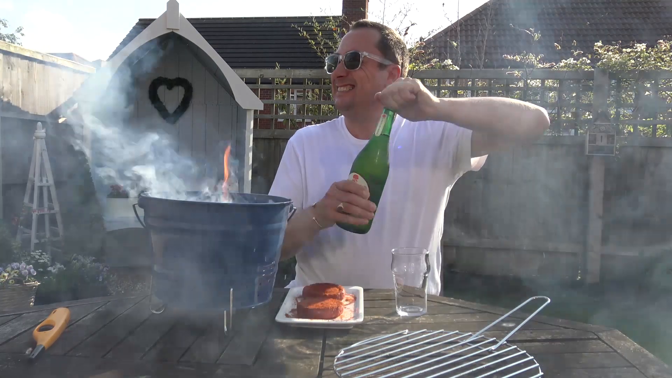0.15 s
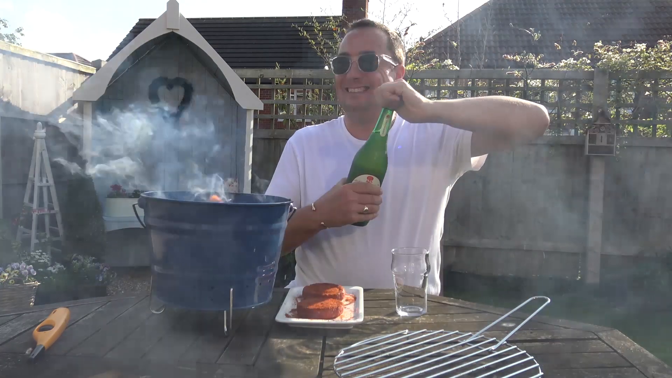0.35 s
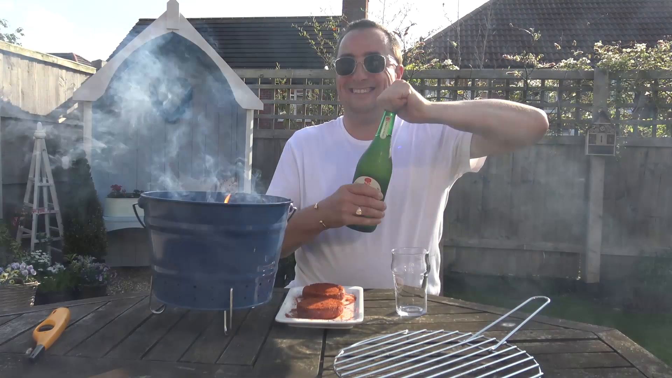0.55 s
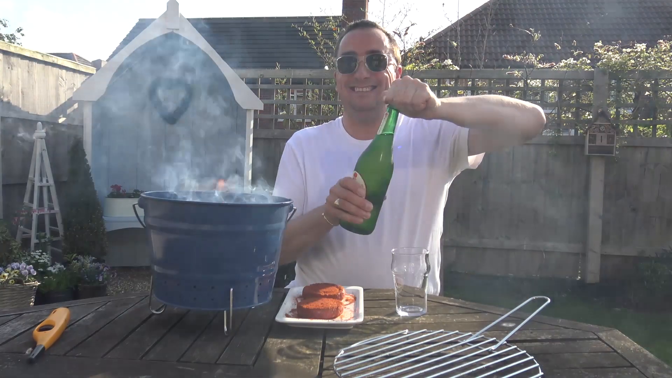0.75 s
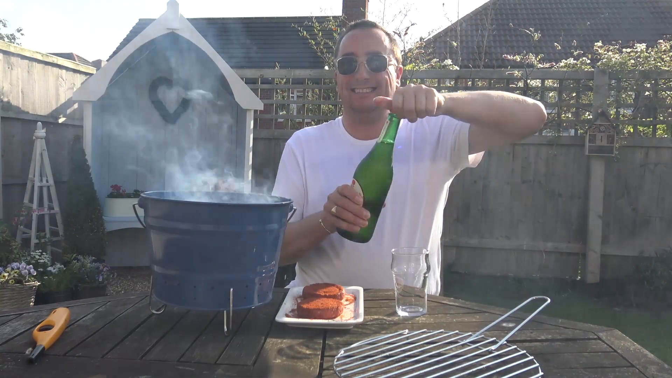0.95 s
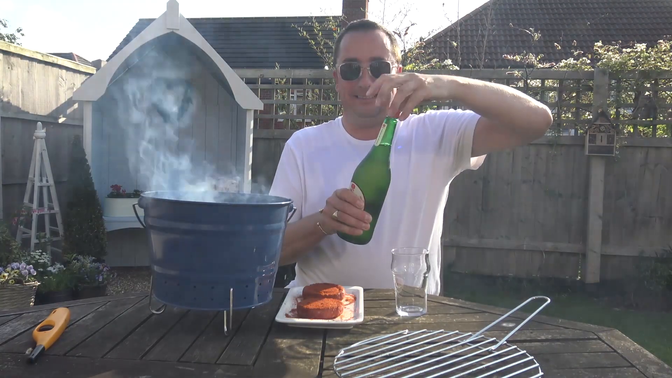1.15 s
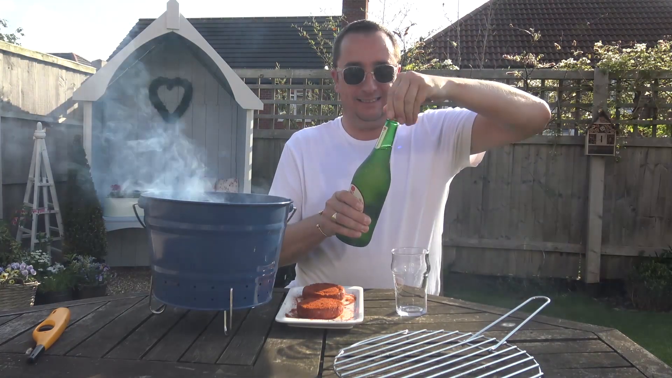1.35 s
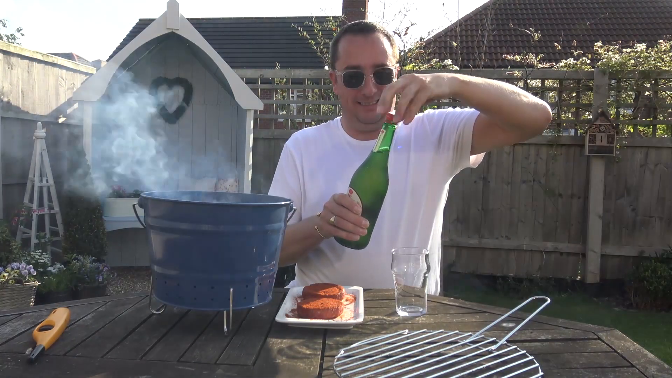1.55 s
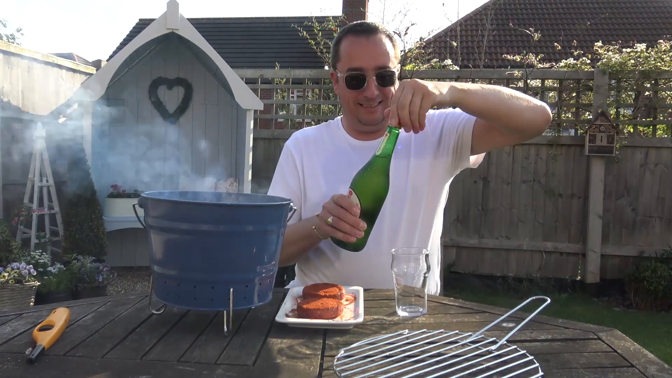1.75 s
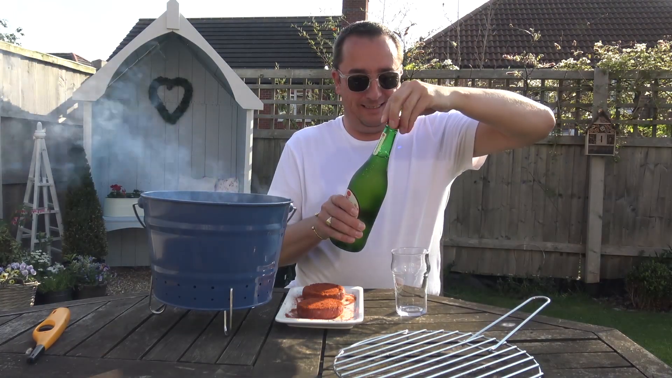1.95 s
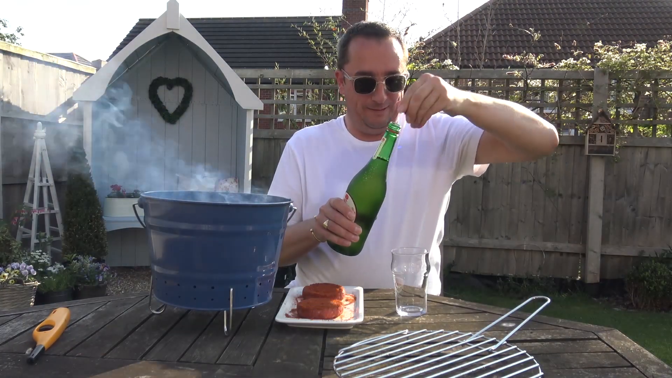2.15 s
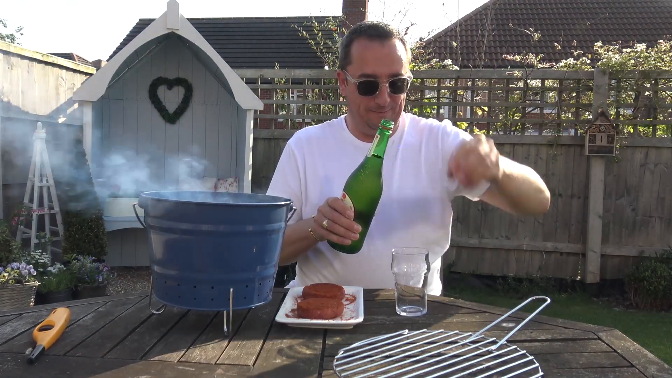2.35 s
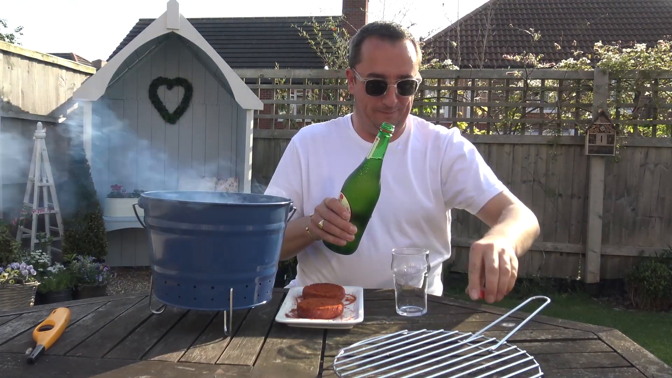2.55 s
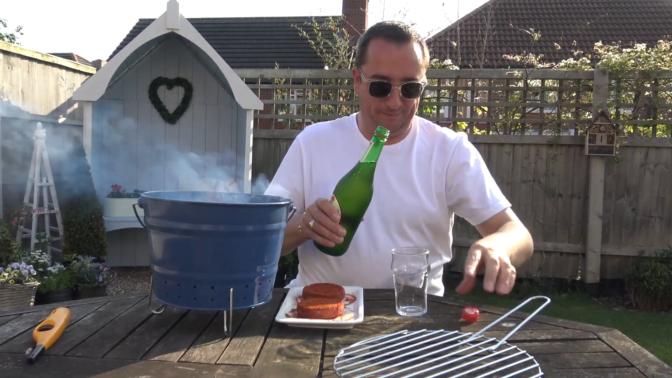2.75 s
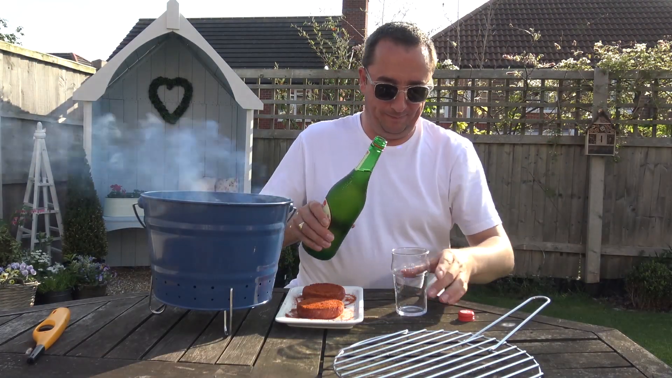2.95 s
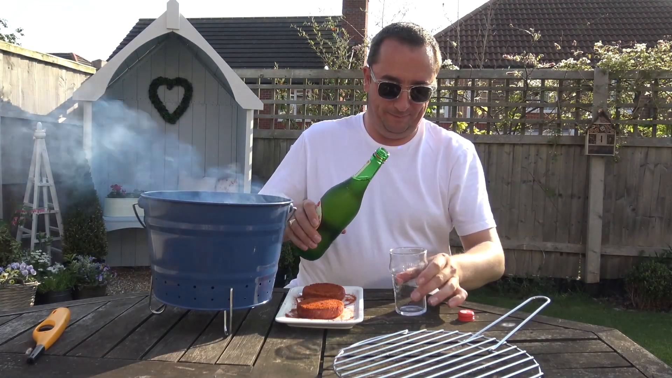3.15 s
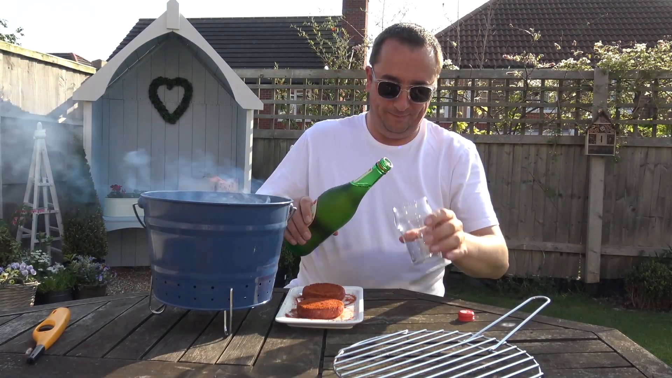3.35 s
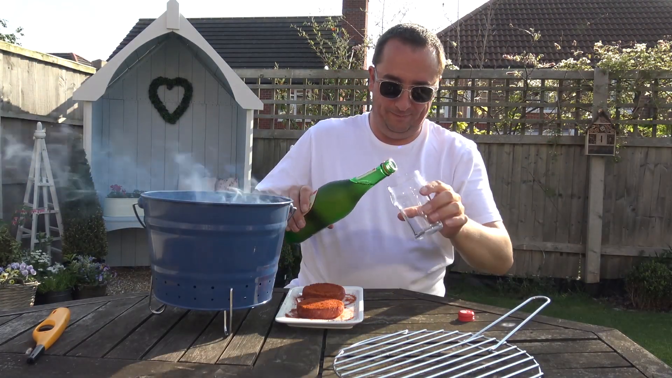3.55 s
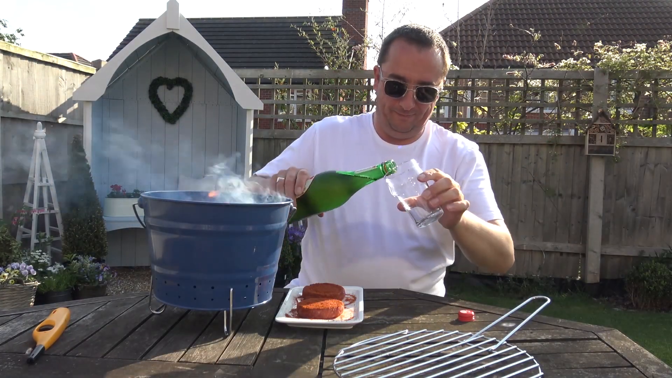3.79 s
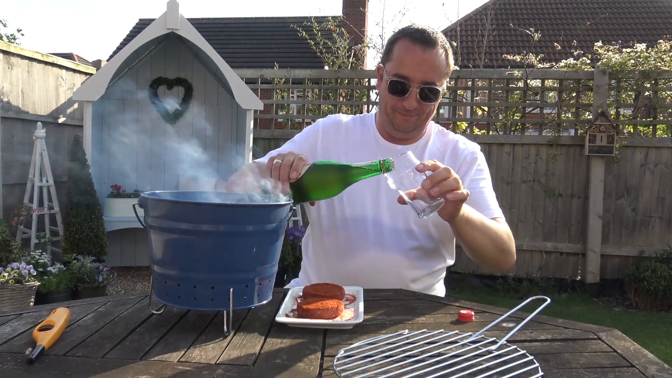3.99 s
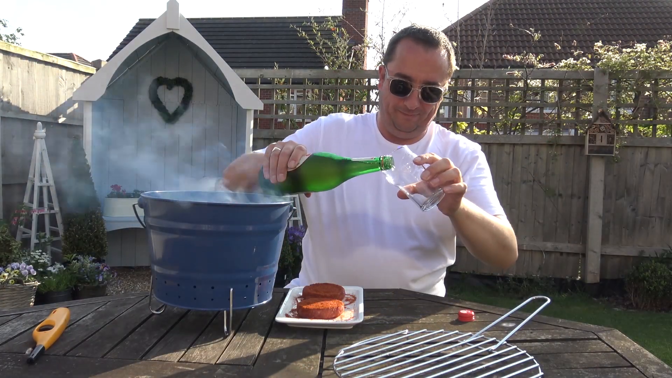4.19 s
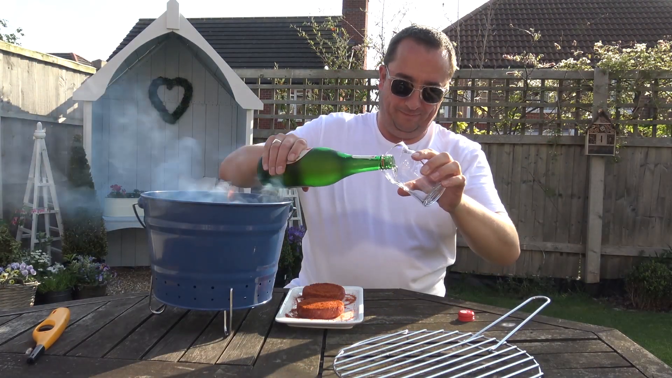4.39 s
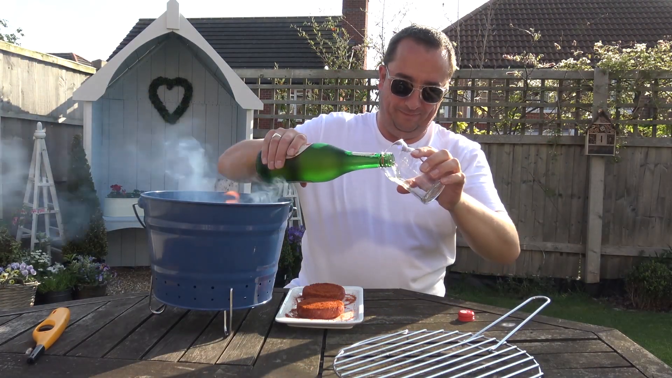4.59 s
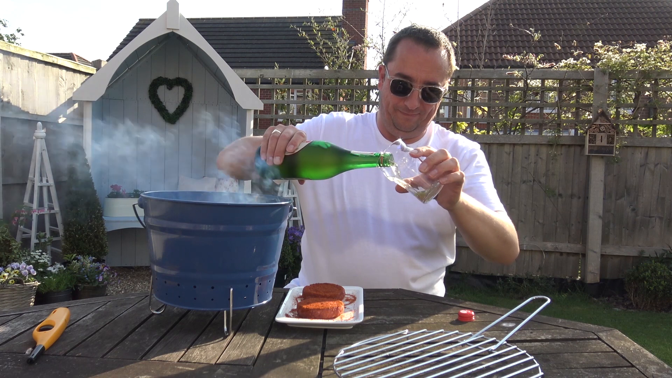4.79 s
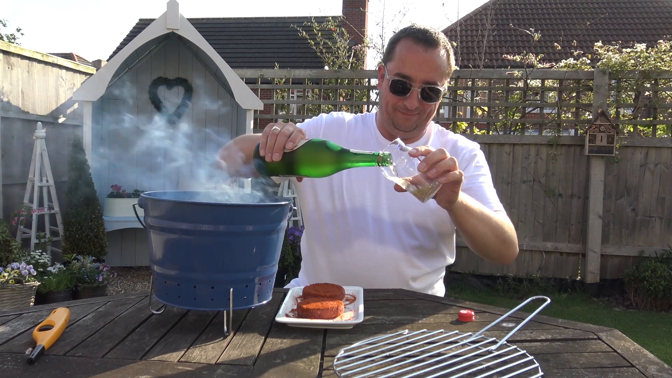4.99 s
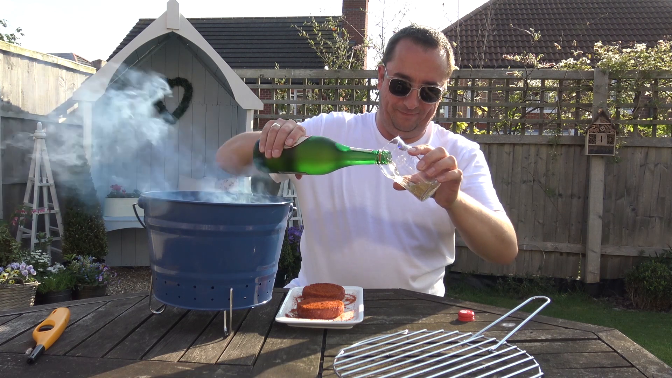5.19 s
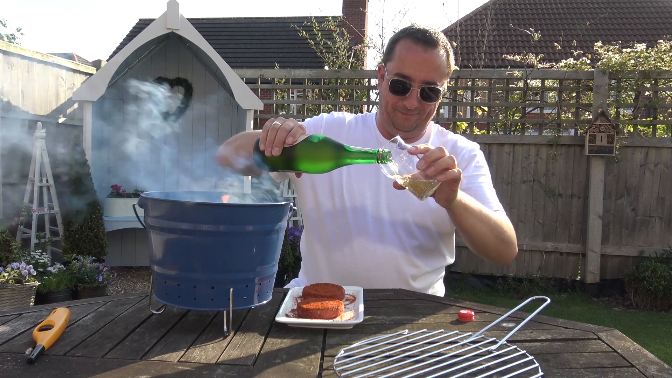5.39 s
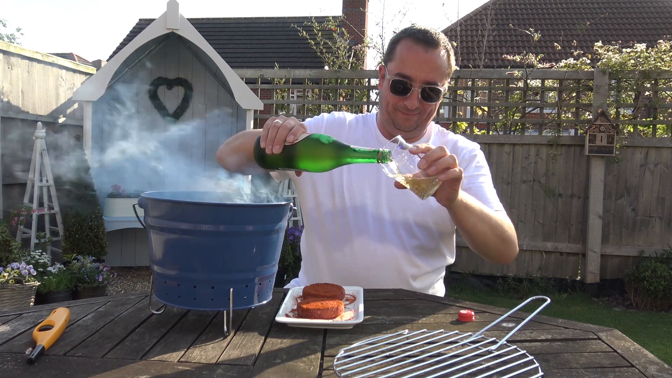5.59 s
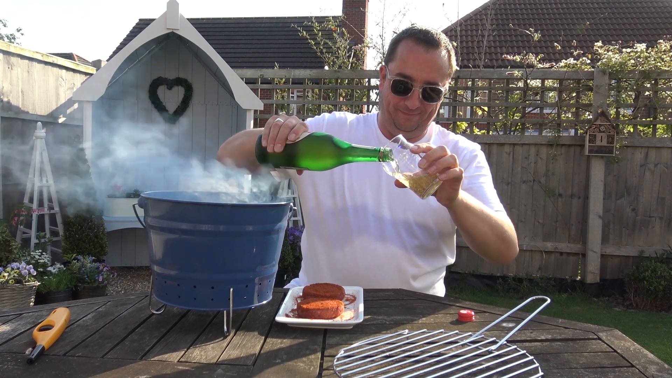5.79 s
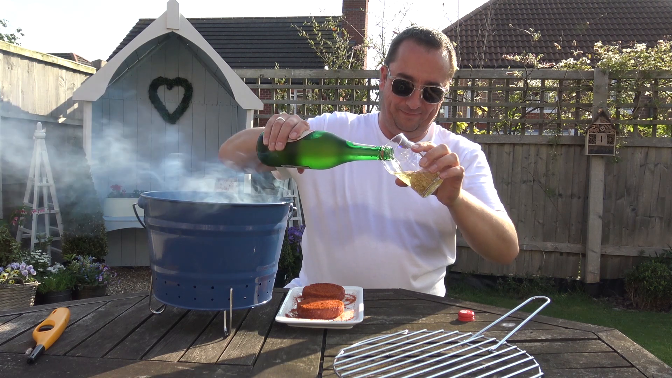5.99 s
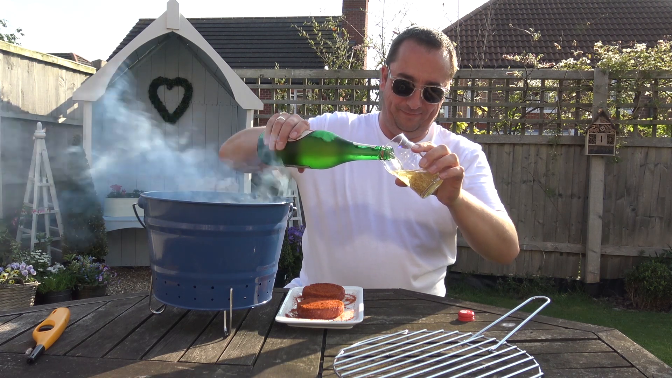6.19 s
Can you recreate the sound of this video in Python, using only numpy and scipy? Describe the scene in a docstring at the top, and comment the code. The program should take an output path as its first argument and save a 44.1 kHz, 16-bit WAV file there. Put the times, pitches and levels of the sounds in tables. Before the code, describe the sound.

A fizzy bottle's screw cap hisses, cracks open and drops on wood, then glass clinks and a drink glugs out beside a garden barbecue.

```python
"""A glass bottle of fizzy drink is opened at a wooden garden table. Gas hisses from under the metal cap
over a brief low drone, the seal snaps, and the cap grinds up its thread, lifts off and bounces on the
planks. A tumbler ticks as it is lifted, the neck chatters against it twice, then the drink glugs out,
dripping and fizzing. Throughout, barbecue flames flutter, air stirs at the microphone, small birds
call far off and fences answer faintly."""
import sys
import numpy as np
from scipy import signal
from scipy.fft import rfft, irfft, next_fast_len
from scipy.io import wavfile
from scipy.ndimage import map_coordinates

SR = 44100
rng = np.random.default_rng(int(sys.argv[2]) if len(sys.argv) > 2 else 0)


def generate_wav(signal):
    """Clip the signal to [-1, 1] and save it as 16-bit WAV at the path in sys.argv[1]."""
    frames = np.transpose(np.atleast_2d(signal))
    scaled = np.clip(frames, -1, 1) * 32767
    pcm = np.round(scaled).astype(np.int16)
    wavfile.write(sys.argv[1], SR, pcm)


N = 275184
TIME = np.arange(N) / SR  # the scene's clock [s]
T = np.arange(SR // 2) / SR  # one event's clock [s]

# the bottle's ringing modes: (frequency [Hz], level [dB], t60 [s])
BOTTLE_MODES = [(668, -1, .15), (2842, 0, .4), (4070, -17, .08), (5180, -22, .08), (8450, -14, .05)]


def amp(db):
    """Decibels to gain."""
    return 10 ** (np.asarray(db) / 20)


def unit(x):
    """Scale to rms 1."""
    return x / np.sqrt(np.mean(x ** 2) + 1e-20)


def along(points, hz):
    """Read (Hz, value) points on a log frequency axis."""
    f, v = np.transpose(points)
    return np.interp(np.log(hz + 1), np.log(f + 1), v)


def curve(rows):
    """One value per sample from (s, value) rows."""
    return np.interp(TIME, *np.transpose(rows))


def wobble(rate, size=N):
    """A smooth random curve, rate knots a second."""
    knots = rng.standard_normal(int(size * rate / SR) + 4)
    return map_coordinates(knots, [np.arange(size) * rate / SR])


def filtered(x, response):
    """x through a complex frequency response."""
    m = next_fast_len(len(x) + SR // 2)
    return irfft(rfft(x, m) * response(np.fft.rfftfreq(m, 1 / SR)), m)[:len(x)]


def coloured(x, spectrum):
    """x with a (Hz, dB) colour, at rms 1."""
    return unit(filtered(x, lambda hz: amp(along(spectrum, hz))))


def resonate(x, peaks):
    """x through (Hz, width Hz, dB) resonances of alternating polarity."""
    return filtered(x, lambda f: sum(
        (-1) ** k * amp(db) * 1j * f * width / (hz * hz - f * f + 1j * f * width)
        for k, (hz, width, db) in enumerate(peaks)))


def highpass(x, edge_hz):
    """Small things radiate little bass."""
    return signal.sosfilt(signal.butter(4, edge_hz, "high", fs=SR, output="sos"), x)


def lowpass(x, edge_hz):
    """A contact of finite length has little top."""
    return signal.sosfilt(signal.butter(2, edge_hz, fs=SR, output="sos"), x)


def sweep(hz):
    """The running phase of a gliding pitch."""
    return 2 * np.pi * np.cumsum(hz) / SR


def ring(modes):
    """Free ringing of (Hz, dB, t60) modes."""
    return sum(amp(db - 60 * T / t60) * np.sin(2 * np.pi * hz * T) for hz, db, t60 in modes)


def burst(t60):
    """Noise that starts at once and dies away."""
    return amp(-60 * T / t60) * rng.standard_normal(len(T))


def unit_hit(x):
    """Scale a hit to the energy of one millisecond at full level."""
    return x / np.sqrt(np.sum(x ** 2) * 1000 / SR)


def attack(rise_s):
    """A softened onset."""
    return 1 - np.exp(-T / rise_s)


def arch(length):
    """A smooth swell and fall."""
    return np.sin(np.pi * np.minimum(T / length, 1))


def add(track, s, x):
    """Mix x into the track at s seconds."""
    start = max(round(s * SR), 0)
    track[start:start + len(x)] += x[:N - start]


def grit(spike_db, size=N):
    """Tiny random impacts; spike_db gathers them into loud and soft clumps."""
    impacts = rng.standard_normal(size) * (rng.random(size) < 4000 / SR)
    return impacts * amp(spike_db * np.clip(wobble(350, size), -2, 2))


def garden(x):
    """A faint scatter from fences and walls."""
    # the scatter's decay: (frequency [Hz], t60 [s])
    decay = [(300, 0.28), (2500, 0.39), (5000, 0.17), (9000, .33), (15000, 0.28)]
    hz, t, noise = signal.stft(rng.standard_normal(SR), SR, nperseg=256)
    tail = signal.istft(noise * amp(-60 * t / along(decay, hz)[:, None]), SR, nperseg=256)[1]
    answer = np.zeros(N)
    add(answer, .008, amp(-21) * tail / np.linalg.norm(tail))
    return signal.fftconvolve(x, answer)[:N]


def air():
    """The hush of the garden, gusts on the microphone and a low drone that sags and soon fades."""
    # colours of the hush and of the wind's rumble: (frequency [Hz], level [dB])
    hush_colour = [(50, -6.5), (90, -1.5), (200, -5), (300, -12.5), (470, -9.5), (700, -8.5), (1000, -9.5),
                   (1600, -17.5), (2600, -26), (4200, -30.5), (6800, -34.5), (8200, -31), (10500, -38),
                   (16000, -37.5)]
    buffet_colour = [(4, -7), (10, -5.5), (18, -8), (30, -18.5), (60, -22.5), (120, -44), (300, -81.5)]
    # gusts: (peak time [s], level [dB], half width [s])
    gusts = [(1.38, -39, 0.11), (1.92, -39, 0.13), (3.05, -37, 0.25), (3.6, -37, .2), (4.17, -32, 0.16),
             (4.55, -32.5, 0.26), (5.6, -44, 0.32), (6.24, -40, 0.063)]
    hush = amp(-50 + 1.3 * wobble(2)) * coloured(rng.standard_normal(N), hush_colour)
    wind = amp(-45.5) + sum(amp(db) * np.exp(-((TIME - s) / width) ** 2) for s, db, width in gusts)
    buffet = wind * amp(-1 + 2 * wobble(16)) * coloured(rng.standard_normal(N), buffet_colour)
    drone_hz = 31 + 12 * np.exp(-TIME / .25)
    drone_db = -40.5 - 54 * np.maximum(TIME - 0.78, 0)
    return hush + buffet + amp(drone_db) * np.sin(sweep(drone_hz))


def birds():
    """Falling chirps, blurred by distance."""
    # chirps: (time [s], length [s], start pitch [Hz], end pitch [Hz], level [dB], blur [Hz])
    chirps = [(0.47, 0.1, 4970, 4130, -68, 81), (0.536, 0.16, 4200, 3660, -59.5, 580),
              (1.194, 0.074, 4900, 4420, -69, 61), (1.326, 0.14, 4110, 3570, -55, 590),
              (2.242, .37, 3500, 3360, -71, 39.9), (2.597, 0.16, 3080, 2630, -63, 49.8),
              (2.985, 0.13, 4400, 3730, -52.5, 505), (3.439, 0.11, 3206, 3040, -64.5, 350),
              (5.702, 0.16, 4530, 3820, -58, 504)]
    out = np.zeros(N)
    for s, length, start_hz, end_hz, db, blur_hz in chirps:
        phase = sweep(np.interp(T, [0, length], [start_hz, end_hz]))
        call = wobble(2 * blur_hz, len(T)) * np.sin(phase) + wobble(2 * blur_hz, len(T)) * np.cos(phase)
        tail = amp(-18 - 60 * T / .7) * arch(T[-1])
        add(out, s, amp(db) * call * (arch(length) + tail))
    return out


def flames():
    """Burning coals puff softly over an irregular flutter."""
    # the flutter's colour: (frequency [Hz], level [dB])
    flutter_colour = [(90, -20.5), (190, -0.5), (300, -6), (460, 3.5), (650, -11.5), (1200, -36.5),
                      (3000, -72)]
    # the main puffs of flame: (time [s], level [dB])
    puffs = [(.159, -32), (.437, -35.5), (.621, -31.5), (.863, -28.5), (1.075, -27.5), (1.176, -30.5),
             (1.526, -30), (1.766, -34.5), (2.515, -32), (2.578, -31), (2.728, -33), (3.07, -38),
             (3.376, -30.5), (4.663, -35.5), (5.19, -28.5), (5.986, -35.5)]
    out = amp(-55 + 4.7 * np.clip(wobble(32), -2, 2)) * coloured(rng.standard_normal(N), flutter_colour)
    stray_puffs = [(s, -34) for s in rng.uniform(0, TIME[-1], size=8)]
    for s, db in puffs + stray_puffs:
        hz = 472 * (1 + 0.02 * rng.normal())
        puff = resonate(arch(0.013) * rng.standard_normal(len(T)), [(190, 50, -4), (hz, 90, 0)])
        add(out, s - .002, amp(db + 4.5) * unit_hit(lowpass(puff, 1100)))
    return out


def handling():
    """The tumbler ticks against the table and the fingers as it is lifted."""
    # light touches: (time [s], level [dB])
    ticks = [(3.2121, -43), (3.4186, -48), (3.5403, -47)]
    # a tick's resonances: (frequency [Hz], width [Hz], level [dB])
    tick_peaks = [(4200, 1450, -1), (7970, 2000, 0.5), (12500, 2500, -5.5)]
    out = np.zeros(N)
    for s, db in ticks:
        add(out, s, amp(db - 5) * unit_hit(resonate(burst(.025), tick_peaks)))
    return out


def gas():
    """The jet under the cap; one whistling resonance swells, then sinks as the pressure falls."""
    # the escape's envelope: (time [s], level [dB])
    escape = [(0.0, -28.5), (0.014, -31), (0.078, -25), (0.128, -29), (0.26, -44), (0.348, -52.5),
              (0.45, -65)]
    # the jet's colour: (frequency [Hz], level [dB])
    jet_colour = [(530, -52.5), (900, -21.5), (1150, -29.5), (1750, -18), (2120, -26), (3550, -15.5),
                  (4050, -24.5), (4520, -7.5), (5550, -15), (6110, -4.5), (7060, -11.5), (7860, -7),
                  (10400, -15), (12300, -14), (16000, -19.5)]
    # the whistle in the gap: (time [s], pitch [Hz], level within the hiss [dB])
    glide = [(0, 7980, -12), (.085, 7980, -0.5), (.145, 6210, 2.5), (.22, 5340, -20), (.35, 4580, -5)]
    jet = coloured(rng.standard_normal(N), jet_colour)
    whistle_hz = curve([(s, hz) for s, hz, db in glide])
    whistle_db = curve([(s, db) for s, hz, db in glide])
    whistle = amp(whistle_db) * unit(wobble(1400) * np.sin(sweep(whistle_hz)))
    cavity = unit(resonate(rng.standard_normal(N), [(8000, 260, 0)]))
    flow = amp(curve(escape) - 1.4 + 0.71 * wobble(120)) * curve([(.37, 0.98), (.44, 0.05)])
    return flow * (amp(-0.5) * jet + whistle + amp(-6.5) * cavity)


def rub(force, skirt_share):
    """Friction shared between the glass thread and the cap's thin, shrill skirt."""
    # resonances of thread and skirt: (frequency [Hz], width [Hz], level [dB])
    thread_peaks = [(766, 86, -3.5), (1248, 185, -7), (1930, 570, -2), (2370, 400, -4.5), (2750, 280, -2),
                    (3800, 820, -6), (4650, 200, -7), (5070, 400, -12), (8320, 1200, -17.5)]
    skirt_peaks = [(2968, 370, -7), (5200, 440, -9), (6870, 640, -1), (8150, 660, 4), (9500, 500, -2.5),
                   (10400, 1200, -9.5), (12700, 1000, -4.5), (15200, 790, -9)]
    rasp = unit(resonate(force, thread_peaks))
    skirt = unit(resonate(force, skirt_peaks))
    return np.sqrt(1 - skirt_share) * rasp + np.sqrt(skirt_share) * skirt


def thread():
    """The cap grinds up the thread, damping the neck until it lifts off and the bottle rings on."""
    # twists of the wrist: (peak time [s], level [dB], swell [s], release [s], skirt share [0-1])
    strokes = [(.85, -31, 0.2, 0.12, .8), (1.048, -39.5, 0.025, 0.032, 0.28),
               (1.385, -43.5, .08, .12, 0.17), (1.452, -32.5, 0.088, 0.067, 0),
               (1.502, -29, 0.049, 0.018, 0.03), (1.737, -25.5, 0.039, 0.063, .12),
               (1.88, -27.5, 0.043, .025, .5), (1.924, -34.5, 0.046, .038, .45),
               (2.124, -36, 0.074, .085, .18)]
    # the thread catching and slipping: (time [s], level [dB], length [s], skirt share [0-1])
    slips = [(1.29, -43, 0.0072, .4), (1.312, -41.5, 0.0063, 0.16), (1.372, -35.5, 0.0078, 0),
             (1.443, -38.5, 0.011, 0), (1.678, -26, 0.01, .35), (1.863, -27, 0.02, 0.76),
             (1.986, -22, 0.0052, 0.4), (1.9887, -18, 0.0083, .4), (2.005, -30, .0081, 0),
             (2.152, -39, .02, .5)]
    lift_s = 2.161
    out = np.zeros(N)
    for s, db, swell, release, skirt_share in strokes:
        effort_db = -20 * np.maximum((s - TIME) / swell, (TIME - s) / release)
        out += amp(db - 5 + effort_db) * rub(grit(spike_db=1.5), skirt_share)
    out *= np.clip((lift_s - TIME) / 0.013 + 1, 0, 1)
    for s, db, length, skirt_share in slips:
        grip = arch(length) + amp(-9.5 - 60 * T / 0.1)
        add(out, s, amp(db) * grip * rub(grit(spike_db=-3, size=len(T)), skirt_share))
    looseness_db = curve([(1.5, 5.5), (1.65, 16)])  # the neck rings more as the cap gives
    neck_peaks = [(2850, 26, 1.5), (4080, 50, -16), (5190, 50, -17), (8450, 80, -14)]
    out += resonate(out * amp(looseness_db), neck_peaks)
    add(out, lift_s, amp(-32.5) * ring(BOTTLE_MODES) * attack(.003))  # the fingers let go gently
    return highpass(out, 500)


def seal():
    """Each bridge of the seal cracks, shaking the cap and setting the bottle ringing."""
    # bridges breaking: (time [s], level [dB], low shelf [dB], top shelf [dB])
    snaps = [(.642, -8, 4.5, 3), (0.6971, -5.5, -1, -4.5), (0.7352, -5, 4, -4.5), (0.7798, -5.5, -6.5, -15),
             (0.8115, -10, 2.5, -11), (0.8491, -5.5, 8, 5.5)]
    # the crack's resonances: (frequency [Hz], width [Hz], level [dB])
    crack_peaks = [(1472, 210, -12.5), (2920, 270, -5), (3823, 460, -9.5), (4940, 330, 0.5),
                   (6240, 637, -2), (8000, 660, 7.5), (9430, 470, -12.5), (10400, 837, -16.5),
                   (12970, 1600, -4), (13240, 800, -10.5), (16780, 600, -22.5)]
    out = np.zeros(N)
    for s, db, low_db, top_db in snaps:
        shelves = [(4500, low_db), (7500, 0), (12000, top_db)]
        peaks = [(hz * (1 + 0.021 * rng.normal()), width, level + along(shelves, hz))
                 for hz, width, level in crack_peaks]
        tear = arch(0.0018) * burst(0.0067) + amp(-16.5) * burst(0.023)
        crack = highpass(unit_hit(resonate(tear, peaks)) + amp(-13) * unit_hit(tear), 1250)
        damped_ring = amp(db + low_db - 27 - 60 * T / 0.17) * ring(BOTTLE_MODES[1:])
        add(out, s, amp(db + 3.5) * crack + damped_ring)
        add(out, s + .0143, amp(db - 13.5) * crack)  # slap off a near surface
    return out


def cap():
    """The dropped cap clacks, rings thinly and knocks the planks at each bounce."""
    # bounces: (time [s], level [dB], planks [dB], plank tilt [dB/octave], cap ring [dB])
    bounces = [(2.7773, -7.5, 0.5, -1, 13.5), (2.8178, -17.5, 6, -2, -9), (2.8639, -12.5, 2.5, 4.5, -8),
               (2.8801, -13, -5, -2, 4.5), (2.927, -17, 2.5, 4.5, 9.5), (2.9507, -40, 20, 5, 18)]
    # resonances of the cap's shell and of the planks: (frequency [Hz], width [Hz], level [dB])
    shell_peaks = [(2050, 150, -2), (2560, 350, -3.5), (3230, 530, -1.5), (4130, 242, 1),
                   (5300, 800, -22.5), (8750, 4500, -35)]
    plank_peaks = [(393, 110, -1.5), (486, 140, -1.5), (684, 200, 0), (830, 180, -1.5), (1160, 130, 0.5),
                   (1650, 150, -4.5), (2120, 290, -3.5), (2770, 290, -8)]
    # the cap's metallic ring: (frequency [Hz], level [dB], t60 [s])
    cap_modes = [(6760, -1, 0.04), (7040, -10.5, 0.066), (12500, -11.5, 0.064), (13100, -10, .05),
                 (14500, -16.5, .05)]
    out = np.zeros(N)
    for s, db, planks_db, tilt_db, ring_db in bounces:
        shell = [(hz * (1 + 0.0076 * rng.normal()), width, level) for hz, width, level in shell_peaks]
        strike = burst(0.012) + amp(-26) * burst(.055)
        clack = amp(5) * unit_hit(lowpass(resonate(strike, shell), 9400))
        wood = [(hz, width, level + tilt_db * np.log2(hz)) for hz, width, level in plank_peaks]
        knock = amp(planks_db - 4.5) * unit_hit(highpass(resonate(burst(0.1), wood), 330))
        add(out, s, amp(db) * (clack + knock + amp(ring_db - 24) * ring(cap_modes)))
    return out


def glugs():
    """Each gulp of air into the neck rings briefly and sinks in pitch as it swells."""
    # gulps: (time [s], level [dB], nominal pitch [Hz])
    gulps = [(4.5238, -29, 1510), (4.7946, -24.5, 1557), (5.0654, -22, 1596), (5.3398, -31, 1637),
             (5.6193, -27, 1794), (5.905, -26.5, 2100), (6.2135, -36.5, 2000)]
    # the air pocket's modes: (pitch multiple [ratio], level [dB])
    pocket_modes = [(0.448, 0.5), (1.003, 3), (1.31, -7.5), (2.34, -12.5), (3.52, -19)]
    out = np.zeros(N)
    life = attack(0.00075) * np.exp(-(T / 0.0067) ** 2)
    for s, db, hz in gulps:
        phase = sweep(hz * (0.912 + 0.11 * np.exp(-T / 0.014)))
        pocket = sum(amp(level) * np.sin(multiple * phase) for multiple, level in pocket_modes)
        add(out, s, amp(db - 7.5) * life * pocket)
    return out


def drips():
    """Drops plink in the tumbler, each splash ringing a small cavity."""
    # the clearest drops: (time [s], level [dB])
    drops = [(5.413, -43), (5.6226, -32.5), (5.6725, -35.5), (5.721, -42.5), (5.8694, -39), (5.892, -44),
             (6.0123, -42)]
    driplets = [(s, -50) for s in rng.uniform(5.28, 6.9, size=6)]
    out = np.zeros(N)
    for s, db in drops + driplets:
        hz = 2250 * (1 + 0.048 * rng.normal())
        cavity = [(hz, 90, 0), (hz * rng.uniform(1.44, 2.06), 200, -8),
                  (hz * rng.uniform(1.85, 3.1), 300, -10), (8000, 700, -12)]
        splash = lowpass(burst(0.032) * attack(0.00051), 7200)
        add(out, min(s, TIME[-1]), amp(db - 0.5) * unit_hit(resonate(splash, cavity)))
    return out


def fizz():
    """The first liquid foams on the dry glass, then settles to a simmer."""
    # the foam's colour: (frequency [Hz], level [dB])
    foam_colour = [(1000, -24.5), (2200, 2.5), (3300, 0.5), (4500, -3), (5400, -.5), (6700, -8.5),
                   (8200, -8), (15000, -21)]
    age = TIME - 4.33
    foam = np.clip(age / .1, 0, 1) * amp(np.maximum(-59 - 8.5 * age, -69))
    return foam * coloured(grit(spike_db=0), foam_colour)


def rattle(hz, rough):
    """A mode whose phase is shaken by the sliding contact."""
    knots = np.linspace(0, T[-1], num=85)
    shake = np.interp(T, knots, rng.standard_normal(len(knots)))
    return np.sin(2 * np.pi * hz * T + rough * attack(0.0026) * shake)


def contacts(flight, shortest, chatter):
    """Contact times in a chatter: each flight is shorter than the last, down to a steady buzz."""
    flights = np.maximum(flight * .589 ** np.arange(20), shortest)
    times = np.append(0, np.cumsum(flights))
    return times[times < chatter]


def clinks():
    """The neck bounces ever faster on the rim, buzzing at each contact; at rest it damps the glass."""
    # the neck meets the rim: (time [s], level [dB], first flight [s], shortest flight [s],
    # chatter length [s], at rest after [s], place [0 lip - 1 further in])
    touches = [(4.0188, -12.3, .02497, .00863, .105, .125, .03),
               (4.3073, -14.3, .00519, .0047, .034, .052, .96)]
    # neck and tumbler ringing: (frequency [Hz], t60 [s], level at the lip [dB], level further in [dB])
    glass_modes = [(723, .14, -10, -6), (1993, .15, 3.5, -4.5), (2068, .09, -13, -2), (2832, .13, -2, 1.5),
                   (4382, .2, -7.5, -19), (5180, .12, -5.5, -5), (765, .05, -9, -11), (1910, .07, -8, -7),
                   (2170, .05, -14, -10), (2570, .05, -20, -11), (2912, .07, -11, -10),
                   (3190, .06, -20, -11), (3680, .06, -26, -19), (4530, .17, -26, -11),
                   (5045, .06, -20, -11), (6300, .07, -32, -13), (7110, .1, -28, -23),
                   (7945, .11, -19, -15), (8050, .06, -28, -17), (11630, .05, -25, -31),
                   (12340, .08, -26, -21), (13460, .05, -32, -29), (14550, .05, -35, -33)]
    slide_s, scatter_db, bounce_loss_db = 0.093, 1.2, 2.14
    # the free side of the glass rings on, faint and long
    after_ring = ring([(hz, lip, t60 * 3.4) for hz, t60, lip, deep in glass_modes])
    out = np.zeros(N)
    for s, db, flight, shortest, chatter, rest, first_place in touches:
        for k, late in enumerate(contacts(flight, shortest, chatter)):
            place = min(first_place + (late / slide_s) ** 3, 1)  # the contact slides inwards
            modes = [(hz, lip + place * (deep - lip) + rng.normal(0, scatter_db), t60)
                     for hz, t60, lip, deep in glass_modes]
            rough = .25 + .55 * place
            tones = sum(amp(level - 60 * T / t60) * rattle(hz, rough) for hz, level, t60 in modes)
            buzz_peaks = [(hz, 200, level) for hz, level, t60 in modes]
            buzz = unit_hit(resonate(lowpass(burst(0.099), 14000), buzz_peaks))
            clink = tones * attack(0.00068) + amp(-9.5) * buzz
            damping = amp(-260 * np.maximum(late + T - rest, 0))
            add(out, s + late, amp(db + 1 - bounce_loss_db * k) * damping * clink)
        add(out, s, amp(db - 30.5) * after_ring)
    return highpass(out, 390)


def scene():
    """The bottle and tumbler up close, with the garden around them."""
    near = gas() + seal() + thread() + cap() + handling() + clinks() + glugs() + drips() + fizz()
    return (near + garden(near) + flames() + birds() + air())[None]


def record(dry):
    """Peaks clip at full scale, and a steep band limit cuts the very top."""
    top_hz = 15900
    clipped = np.clip(dry[0], -1, 1)
    return filtered(clipped, lambda hz: 1 / (1 + (hz / top_hz) ** 200))[None]


dry = scene()
out = record(dry)
generate_wav(out)
```